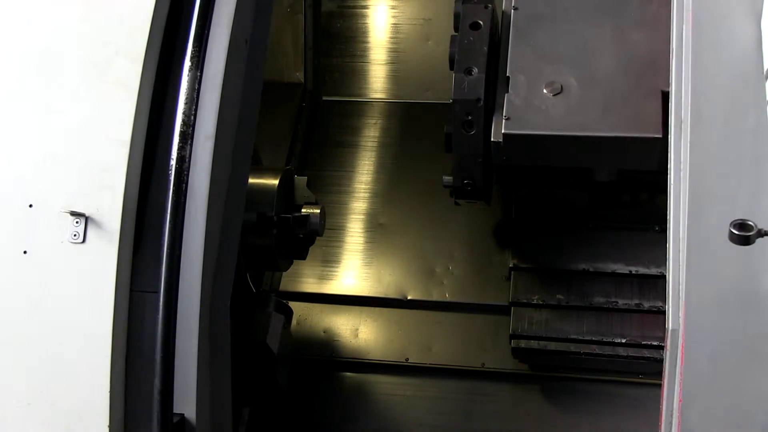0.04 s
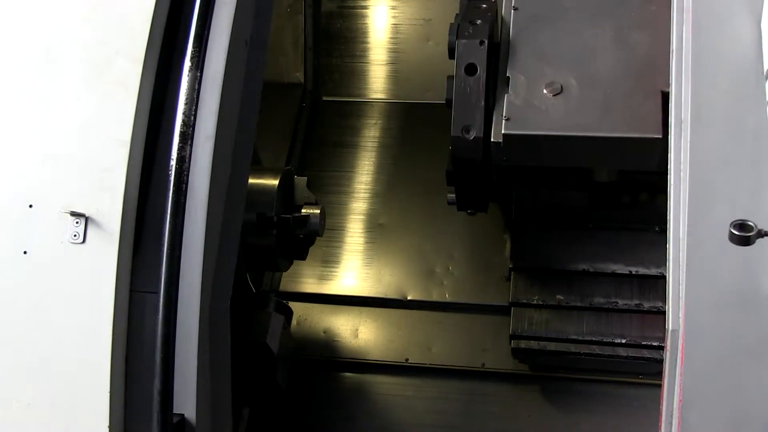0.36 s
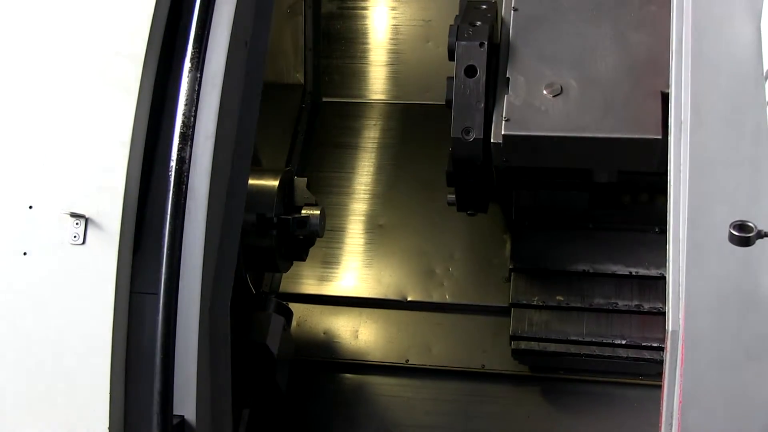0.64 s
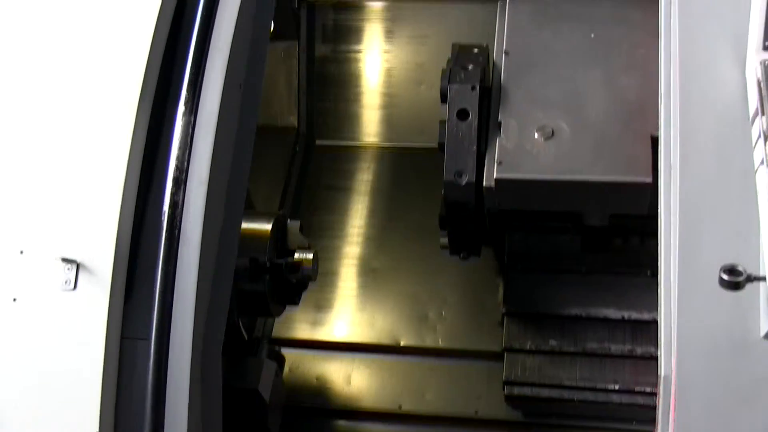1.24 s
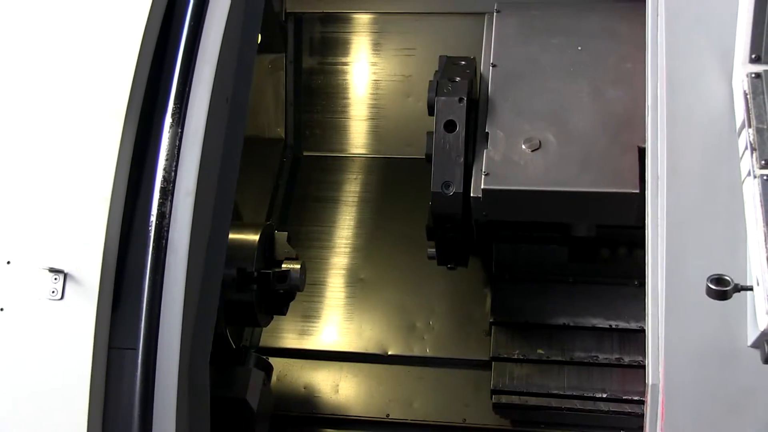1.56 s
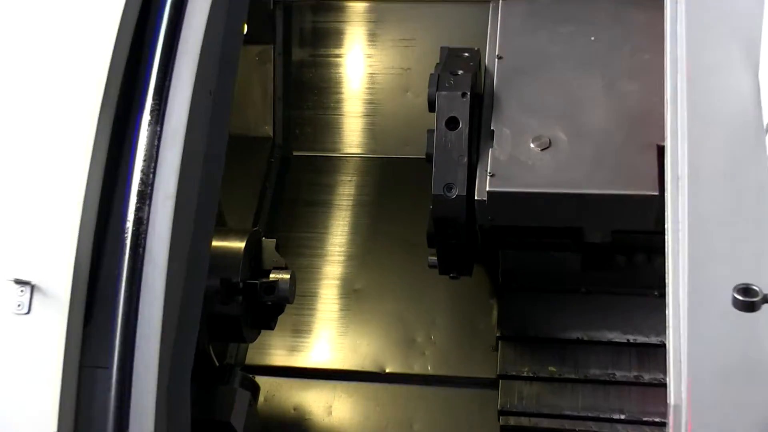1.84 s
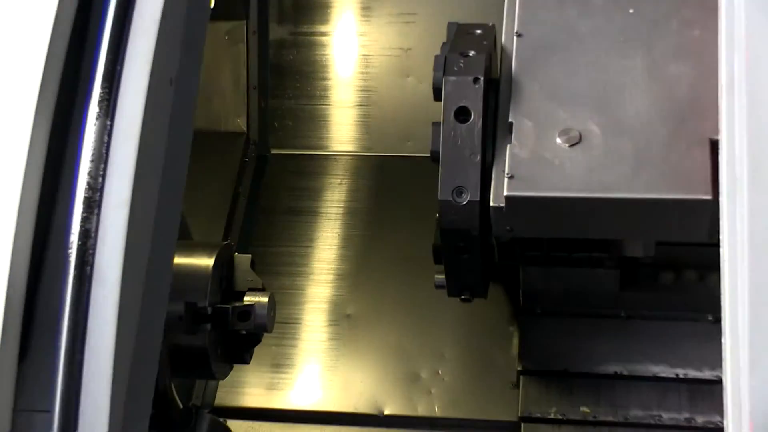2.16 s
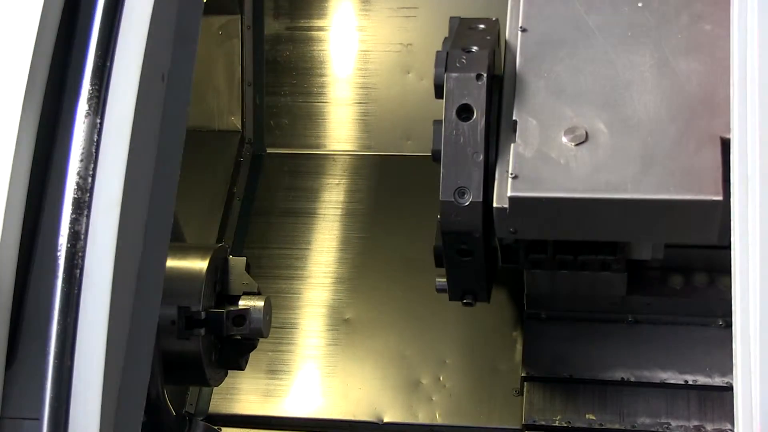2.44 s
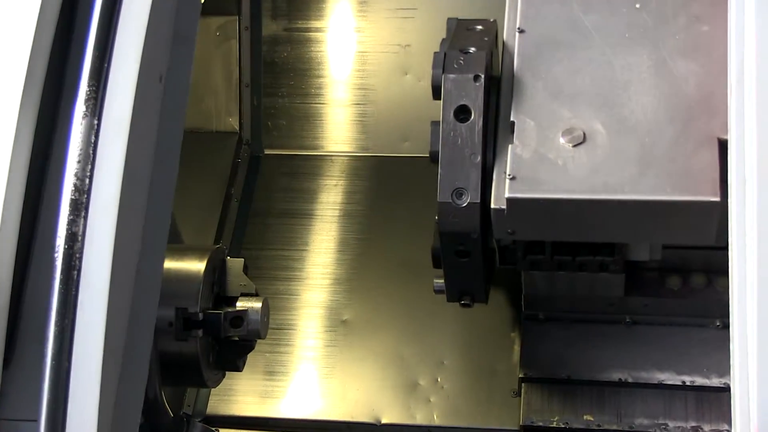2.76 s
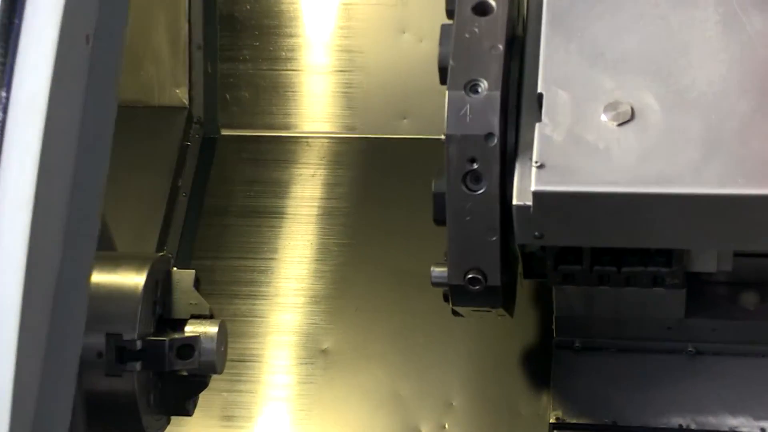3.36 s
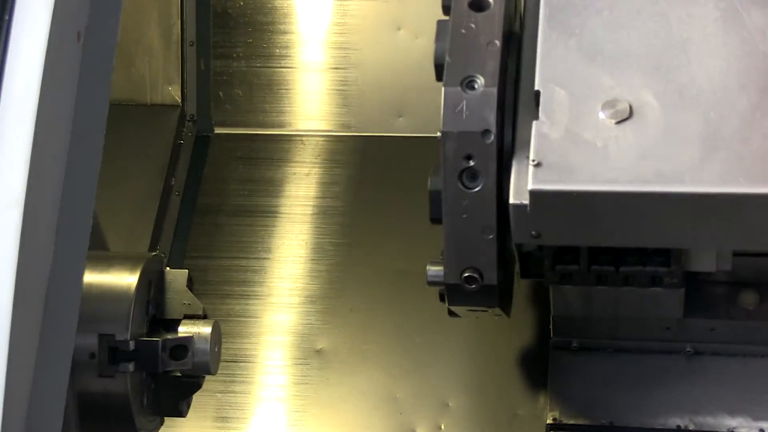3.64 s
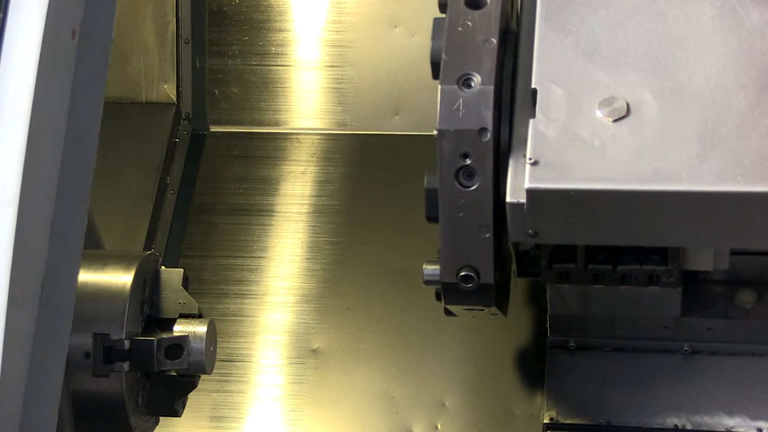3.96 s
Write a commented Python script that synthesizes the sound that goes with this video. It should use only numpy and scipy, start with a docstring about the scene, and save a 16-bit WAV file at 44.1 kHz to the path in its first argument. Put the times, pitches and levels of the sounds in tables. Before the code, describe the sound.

Twice, a lathe turret clunks, knocks as it turns and locks with a sharp double clank that rings briefly in its sheet-steel enclosure. Steady cooling fans and a low, wavering motor hum continue underneath.

```python
"""A lathe changes tools

The tool turret of a lathe turns to a new tool twice inside its sheet-steel enclosure. Each time it
unlocks with a dull clunk, knocks as it turns, and locks with two bright steel clanks that shake the
housing. A few soft knocks follow as it settles. Cooling fans rush and a motor hums throughout."""
import sys
import numpy as np
from scipy import signal
from scipy.fft import irfft
from scipy.io import wavfile

SR = 44100
rng = np.random.default_rng(int(sys.argv[2]) if len(sys.argv) > 2 else 0)


def generate_wav(sig):
    """Save sig (samples, or channels by samples) to the path in sys.argv[1] as 16-bit PCM at SR."""
    pcm = np.round(np.clip(np.atleast_2d(sig).T, -1, 1) * 32767).astype(np.int16)
    wavfile.write(sys.argv[1], SR, pcm)


N = 176400
BLOW_T = np.arange(int(.7 * SR)) / SR  # seconds since a blow began
STEEL_HZ = 4870  # the pitch around which the steel teeth ring


# The locking clanks. Each row: start in seconds, ping pitch in Hz, strike level in dB, ring level in dB,
# brightness in dB per octave, then the levels of the clash, housing thump, thud and rebound in dB.
CLANKS = [(0.5022, 4870, -9, -21.5, -0.5, -36, -20.5, -18, -28),
          (0.6015, 4935, -15.5, -29, -3, -35, -32, -36, -24.5),
          (3.2768, 4940, -8.5, -22, -0.5, -30, -23, -33, -27),
          (3.4024, 4930, -14, -29.5, -3, -29, -42, -40, -30)]
def clank(pitch_hz, strike_db, ring_db, brightness, clash_db, thump_db, thud_db, rebound_db):
    """Steel teeth slide home with a ping, seat with a crunch and clash on as the heavy turret lands."""
    grit = blow_noise(CLANK_COLOUR, brightness + 1.5, STEEL_HZ)
    crunch = contact(peak_s=.0031, width_s=.00074) * grit
    strike = ping(pitch_hz) + amp(-11) * crunch
    clash = noise(lambda hz: -10 * abs(hz - STEEL_HZ) / 460, len(BLOW_T)) * fade(fade_s=.17)
    ringing = rise(.003) * (amp(ring_db) * clank_ring(brightness) + amp(clash_db) * clash)
    landing = amp(thud_db) * thud(hz=430, peak_s=.017, width_s=.0036)
    housing = amp(thump_db) * housing_thump(delay_s=.022, rise_s=.0087)
    return amp(strike_db) * strike + ringing + landing + amp(rebound_db) * rebound() + housing


# The tones of the teeth as they touch. Each row: multiple of the ping pitch, relative level in dB.
TEETH_TONES = [(.8, -16), (1, -3), (1.15, -25), (1.44, -14.5), (1.73, -28), (2.36, -28)]
def ping(pitch_hz, peak_s=.00262, climb_hz_per_s=82000):
    """The teeth sing for a moment, rising in pitch as they press home, and meet with a tiny snap."""
    cycles = np.cumsum(pitch_hz + climb_hz_per_s * (BLOW_T - peak_s)) / SR
    tones = sum(amp(db) * np.sin(2 * np.pi * (ratio * cycles + rng.random()))
                for ratio, db in TEETH_TONES)
    snap = contact(peak_s=.0031, width_s=.0004) * rng.standard_normal(len(BLOW_T))
    return contact(peak_s, width_s=.0014) * tones + amp(-36) * snap


# The noise in a clank, from low to high. Each row: frequency in Hz, relative level in dB.
CLANK_COLOUR = [(300, -9.5), (1200, -6.5), (1800, -11.5), (2350, -2.5), (2750, -10), (3120, -3.5),
                (3450, -7), (3900, 0), (4350, -6), (4850, 4), (5500, -1), (6250, -2.5), (6700, -6),
                (7100, -5), (7800, -2.5), (8200, -12), (8600, -1.5), (9300, -15), (10150, -8.5),
                (10550, -13), (11100, -10), (11700, -3), (12150, -19), (13000, -43), (15000, -62)]
# The echoes of the enclosure and of the workshop. Each row: frequency in Hz, fade time in seconds.
ENCLOSURE_ECHO = [(200, 1), (1500, 0.2), (5000, 0.16), (8000, 0.16), (12000, 0.14)]
WORKSHOP_ECHO = [(2000, 1), (5000, 1), (8000, 0.47), (11000, .14)]
# The tones of the steel coupling. Each row: pitch in Hz, relative level in dB, fade time in seconds.
COUPLING_TONES = [(2328, 1, .17), (2402, -2, .15), (3075, -1.5, .17), (3228, -3, .17), (3822, -4, .15),
                  (3902, -1, .17), (3973, -3, .16), (4735, -5, .19), (5004, 1, .18), (5165, -1, .16),
                  (6142, -3, .13), (6430, -6, .16), (7165, -7, .14), (7294, -6, .14), (7412, -6, .14),
                  (8565, -7, .11), (11540, -10, .08)]
def clank_ring(brightness):
    """The coupling that locks the turret rings on, and the clank echoes in enclosure and workshop."""
    coupling = ring(COUPLING_TONES, brightness, STEEL_HZ)
    enclosure = die_away(blow_noise(CLANK_COLOUR, brightness, STEEL_HZ), ENCLOSURE_ECHO)
    workshop = die_away(blow_noise(CLANK_COLOUR, brightness, STEEL_HZ), WORKSHOP_ECHO)
    return enclosure + amp(-5.5) * coupling + amp(-17.5) * workshop


# The noise in a knock. Each row: frequency in Hz, relative level in dB.
KNOCK_COLOUR = [(200, -19), (800, -4), (1300, 1.5), (2200, 2), (2700, -3), (4000, -6.5), (5200, -8.5),
                (6400, -18.5), (7000, -14.5), (9000, -27), (10200, -26.5), (11000, -52), (13000, -71)]
# The echo of a knock. Each row: frequency in Hz, fade time in seconds.
KNOCK_ECHO = [(200, 0.84), (1500, 0.17), (5000, 0.14), (10000, 0.13)]
# The tones of the turret body. Each row: pitch in Hz, relative level in dB, fade time in seconds.
BODY_TONES = [(831, -6, 0.15), (1102, -5, 0.22), (1246, 0.5, 0.12), (1340, -13, 0.072), (1914, -3, 0.23),
              (2176, 5, 0.071), (2270, 10.5, 0.065), (3130, -3.5, 0.12), (5000, -14.5, 0.077),
              (7000, -9, 0.15)]
# The knocks of unlocking, turning and settling. Each row: start in seconds, level in dB, brightness in
# dB per octave, body ring in dB relative to that level, then housing thump, ping and rebound in dB.
KNOCKS = [(.075, -23.5, 2, -3, -23.5, -29, -24.5), (.2045, -28, 1.5, -4, -38, -35, -45),
          (.828, -31, 0, -6, -24, -55, -40), (.886, -29.5, -4, -7, -55, -59, -50),
          (.954, -36, -3.5, -4, -63, -57, -50), (2.748, -40, -8, 4, -28, -60, -50),
          (2.8405, -25.5, -2, 2, -27.5, -32, -26), (2.948, -33, -1, -3, -57, -55, -50),
          (2.982, -30, -0.5, -3, -26, -50, -43), (3.616, -32.5, -4.5, -9, -57, -60, -53),
          (3.681, -32, 1, -9, -57, -51, -50)]
def knock(level_db, brightness, body_db, thump_db, ping_db, rebound_db, tick_s=.0017):
    """A muffled blow inside the turret: a tick and a light ping, then body and enclosure ring."""
    force = BLOW_T / tick_s * np.exp(1 - BLOW_T / tick_s)
    tick = amp(-6.5) * force * blow_noise(KNOCK_COLOUR, brightness + 5)
    body = amp(body_db) * rise(.0054) * ring(BODY_TONES, brightness)
    echo = rise(.01) * die_away(blow_noise(KNOCK_COLOUR, brightness), KNOCK_ECHO)
    housing = amp(thump_db) * housing_thump(delay_s=.018, rise_s=.007)
    blow = amp(level_db) * (tick + body + echo)
    return blow + amp(ping_db) * ping(STEEL_HZ) + amp(rebound_db) * rebound() + housing


# The tones of the housing panels. Each row: pitch in Hz, relative level in dB, fade time in seconds.
PANEL_TONES = [(128.2, -9, 0.7), (179.6, -1.5, 0.34), (223.4, -5.5, 0.59), (295.5, -1.5, 0.39),
               (329, -2.5, 0.13), (392.5, -5.5, 0.23), (447.4, 2, 0.22), (508.5, -3.5, 0.23),
               (599, -5, 0.21), (818, -9, 0.25)]
def housing_thump(delay_s, rise_s):
    """The housing panels swell and boom just after a blow."""
    return rise(rise_s, delay_s) * ring(PANEL_TONES)


def thud(hz, peak_s, width_s):
    """The turret's weight lands on its seat with a few low vibrations."""
    return contact(peak_s, width_s) * np.sin(2 * np.pi * (hz * BLOW_T + rng.random()))


def rebound():
    """The turret bounces back with a later, deeper thud."""
    return thud(hz=296, peak_s=.042, width_s=.0053)


# The rush of air. Each row: frequency in Hz, relative level in dB.
AIR_COLOUR = [(15, -48.5), (33, -38), (41, -6), (55, -10), (80, -7), (98, -17), (118, 1), (175, -1.5),
              (250, 0), (340, -1), (420, -1.5), (600, -7), (850, -7.5), (1300, -10.5), (1600, -13.5),
              (2200, -18.5), (2800, -23), (4500, -28.5), (6000, -35), (7500, -42.5), (8900, -42.5),
              (9600, -76.5), (13000, -83)]
# The tones of the motor and fans. Each row: pitch in Hz, level in dB, width of the wavering in Hz.
MOTOR_TONES = [(416.3, -44, 8.5), (1992, -60, 3.5), (2360, -63, 4)]
def fans(level_db=-31, flutter_db=.67, flutter_hz=12):
    """Cooling fans blow steady, slightly fluttering air, with a few wavering motor tones."""
    loudness = amp(level_db + flutter_db * waver(0, flutter_hz, N))
    air = loudness * noise(lambda hz: look_up(AIR_COLOUR, hz), N)
    return air + sum(amp(db) * waver(hz, width, N) for hz, db, width in MOTOR_TONES)


# How loud the hum is over time. Each row: time in seconds, level in dB.
HUM_LEVELS = [(0, -49), (.35, -40.5), (.7, -41), (1.05, -44.5), (1.4, -44.5), (1.7, -35.5), (2.05, -43),
              (2.4, -44.5), (2.8, -40), (3.0, -39.5), (3.35, -40.5), (3.6, -41), (4, -46)]
def motor_hum(pitch_hz=175, width_hz=14):
    """The motor's low hum wavers, swelling and ebbing."""
    times, db = np.transpose(HUM_LEVELS)
    return amp(np.interp(np.arange(N) / SR, times, db)) * waver(pitch_hz, width_hz, N)


def ring(tones, brightness=0, pivot_hz=2000):
    """A struck part rings with several tones, each fading at its own speed."""
    hz, db, fade_s = np.transpose(tones)[:, :, None]
    gain = amp(db + tilt(hz, brightness, pivot_hz))
    waves = np.sin(2 * np.pi * (hz * BLOW_T + rng.random(hz.shape))) * fade(fade_s)
    return (gain * waves).sum(0) / np.sqrt((gain ** 2).sum() / 2)


def contact(peak_s, width_s):
    """The force of a brief touch grows and falls in a bell shape."""
    return np.exp(-.5 * ((BLOW_T - peak_s) / width_s) ** 2)


def rise(rise_s, delay_s=0):
    """Climbs evenly from silence to full level."""
    return np.clip((BLOW_T - delay_s) / rise_s, 0, 1)


def fade(fade_s, t=BLOW_T):
    """Falls by 60 dB over the fade time."""
    return np.exp(-np.log(1000) * t / fade_s)


def die_away(sound, echo):
    """Fades each frequency of a sound at the speed an echo table gives."""
    hz, t, spectrum = signal.stft(sound, SR, nperseg=256)
    faded = spectrum * fade(look_up(echo, hz)[:, None], t)
    return signal.istft(faded, SR)[1][:len(sound)]


def blow_noise(colour, brightness, pivot_hz=2000):
    """Noise for one blow, shaped by a colour table and made brighter or duller."""
    return noise(lambda hz: look_up(colour, hz) + tilt(hz, brightness, pivot_hz), len(BLOW_T))


def waver(centre_hz, width_hz, size):
    """A narrow band of noise: a wavering tone, or a slow random drift when centred on zero."""
    return noise(lambda hz: -20 * np.log10(1 + ((hz - centre_hz) / width_hz) ** 2), size)


def noise(colour_db, size):
    """Noise of strength 1; colour_db gives the relative level of each frequency."""
    hz = np.fft.rfftfreq(size, 1 / SR)
    sound = irfft(amp(colour_db(hz)) * np.exp(2j * np.pi * rng.random(len(hz))), size)
    return sound / np.sqrt(np.mean(sound ** 2) + 1e-20)


def tilt(hz, brightness, pivot_hz):
    """The dB to add for a brighter or duller sound: zero at the pivot, flat in the bass."""
    return brightness * np.log2(np.maximum(hz, pivot_hz / 4) / pivot_hz)


def look_up(table, hz):
    """Reads between a table's rows, giving each octave equal room."""
    row_hz, values = np.transpose(table)
    return np.interp(np.log(hz + 1), np.log(row_hz), values)


def amp(db):
    """Turns decibels into a volume factor."""
    return 10 ** (np.asarray(db) / 20)


def add(mix, start_s, sound):
    """Mixes a sound in at its start time."""
    part = mix[round(start_s * SR):][:len(sound)]
    part += sound[:len(part)]


def scene():
    """The turret clanks and knocks over the fans and the hum, in mono."""
    mix = fans() + motor_hum()
    for start_s, *blow in CLANKS:
        add(mix, start_s, clank(*blow))
    for start_s, *blow in KNOCKS:
        add(mix, start_s, knock(*blow))
    return mix[None]


def record(dry, cutoff_hz=15300):
    """Cuts away the very highest treble."""
    low_pass = signal.firwin(255, cutoff_hz, window=("kaiser", 8), fs=SR)
    return signal.oaconvolve(dry, low_pass[None], "same")


dry = scene()
out = record(dry)
generate_wav(out)
```